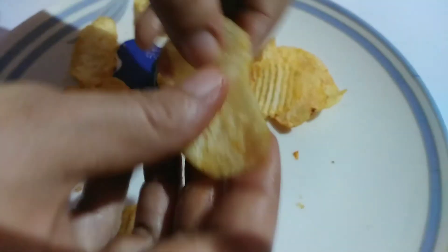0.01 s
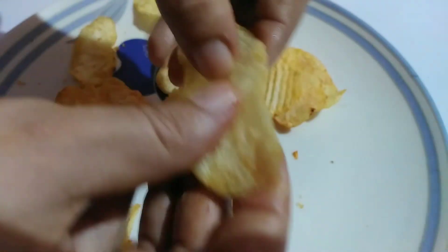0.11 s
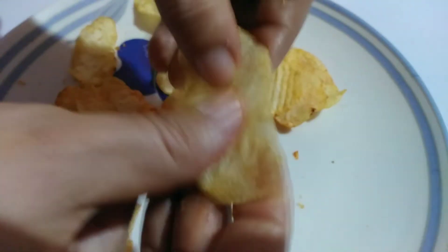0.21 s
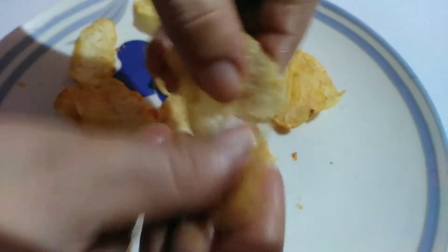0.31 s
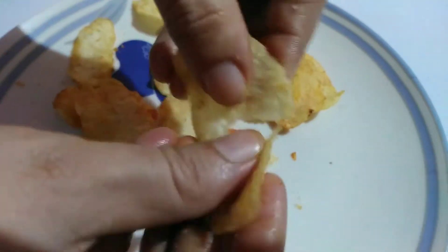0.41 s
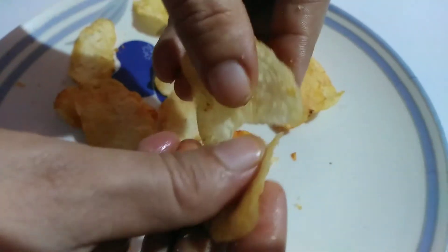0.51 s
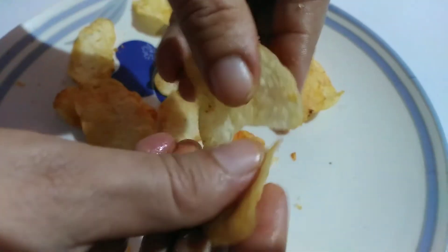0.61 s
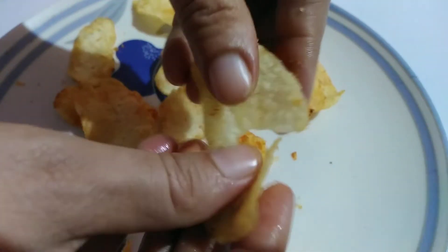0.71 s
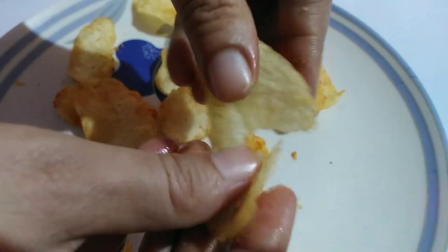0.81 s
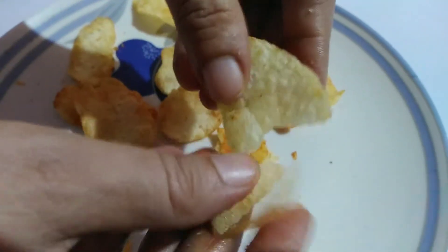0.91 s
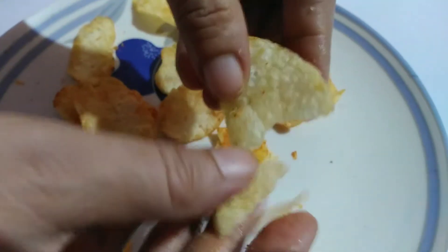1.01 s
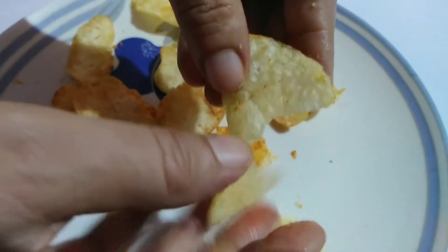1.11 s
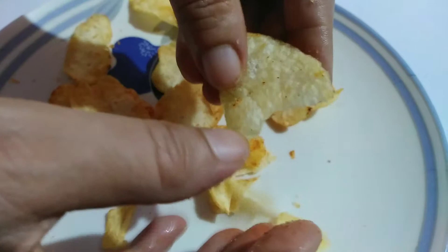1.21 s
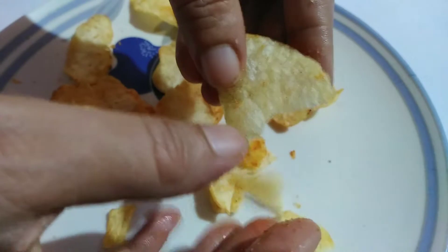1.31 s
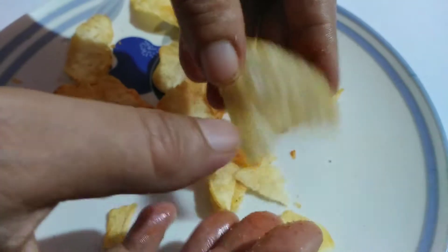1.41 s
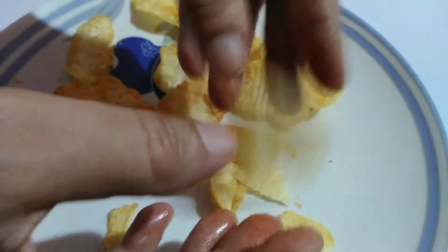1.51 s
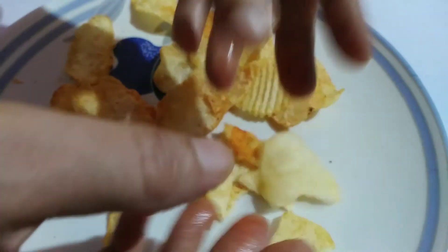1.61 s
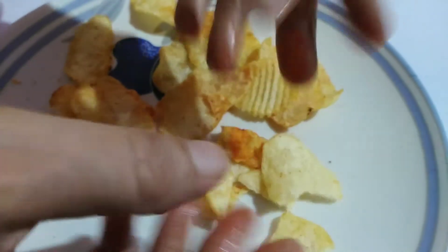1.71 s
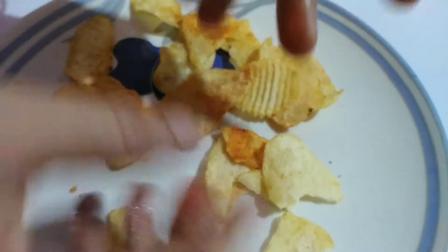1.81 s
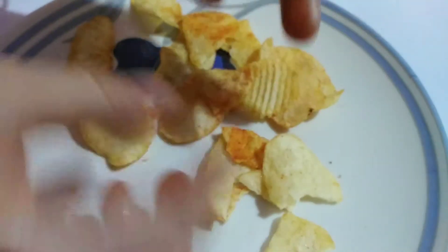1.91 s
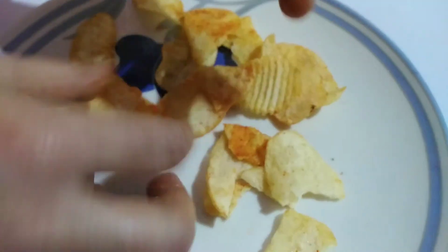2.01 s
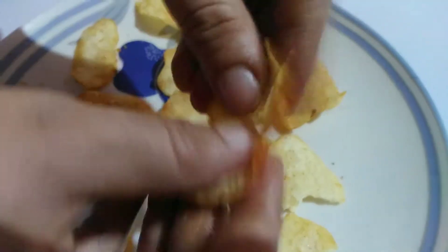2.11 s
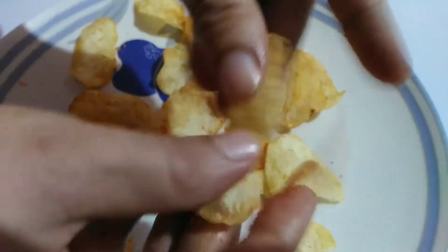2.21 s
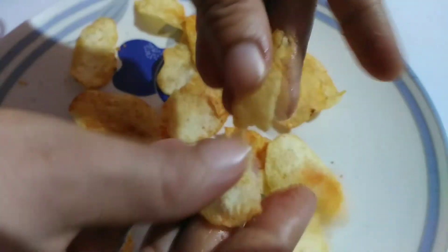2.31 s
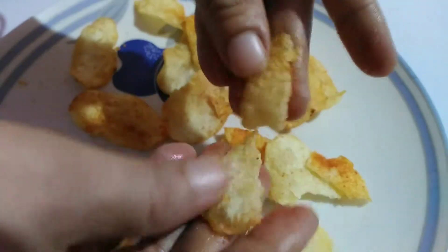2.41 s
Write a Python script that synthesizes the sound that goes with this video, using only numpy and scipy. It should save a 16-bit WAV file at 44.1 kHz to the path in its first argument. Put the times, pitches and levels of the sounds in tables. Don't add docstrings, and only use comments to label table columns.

```python
import sys
import numpy as np
from scipy import signal
from scipy.fft import rfft, irfft, next_fast_len
from scipy.io import wavfile
from scipy.ndimage import uniform_filter1d

SR = 44100
rng = np.random.default_rng(int(sys.argv[2]) if len(sys.argv) > 2 else 0)


def boost(x):
    u = np.asarray(x, float) / 20
    return 10 ** u


def store_wav(level_fs):
    pcm = np.round(np.clip(np.atleast_2d(level_fs), -1, 1) * 32767)
    wavfile.write(sys.argv[1], SR, pcm.T.astype(np.int16))


N = 110250
LEAD = 6615
BURST = 4096
SIDES = np.array([[1], [-1]])


def t_axis(size):
    return np.arange(size) / SR


def band(x, hz, width, order=1):
    edges = [hz * 2 ** (-width / 2), min(hz * 2 ** (width / 2), 0.45 * SR)]
    return signal.sosfilt(signal.butter(order, edges, "band", fs=SR, output="sos"), x)


def unit(x):
    return x / np.sqrt(np.mean(x ** 2))


def walk(rate):
    k = int(SR / rate)
    return unit(uniform_filter1d(uniform_filter1d(rng.standard_normal(N), k), k))


def contour(f, table):
    hz, db = np.transpose(table)
    return np.interp(np.log(f), np.log(hz), db)


def even(x):
    spec = rfft(x)
    return irfft(spec / np.sqrt(uniform_filter1d(abs(spec) ** 2, size=40)), len(x))


def modal_sum(modes, phases, size):
    t = t_axis(size)
    out = np.zeros(size)
    for (hz, db, t60), phase in zip(modes, phases):
        out += boost(db) * np.sin(2 * np.pi * hz * t + phase) * boost(-60 * t / t60)
    onset_s = 0.00013
    return out * (1 - np.exp(-t / onset_s))


def fracture_force(burst_s):
    rise_s, crumb_s, crumb_db, strike = 0.0005, 0.016, -21, 3.6
    t = t_axis(BURST)
    fade = np.exp(-(t / burst_s) ** 2) * (1 - np.exp(-(t + 1 / SR) / rise_s))
    size = np.minimum(rng.exponential(1, BURST), 3.5)
    burst = fade * boost(1 * size) * (rng.random(BURST) < 0.5)
    crumbs = boost(crumb_db) * np.exp(-t / crumb_s) * (rng.random(BURST) < 0.05) * (t > burst_s)
    force = rng.standard_normal(BURST) * (burst + crumbs * boost(3 * size))
    force[int(rise_s * SR)] += strike
    return even(force) * (t < 0.08)


def chip_modes(hz, spread, t60, count):
    modes = [(hz, 1.5, 2.6 * t60)]
    for a, (shift, gain) in zip(np.linspace(-2, 2, count), rng.standard_normal((count, 2))):
        mode_hz = min(hz * 2 ** (spread * (a + 0.0667 * shift)), 15000)
        modes.append((mode_hz, 2.0 * gain - 6.0 * a * a, t60))
    return modes


def cracks(rows, burst_s, spread, ring_t60, plate_db, lag_s, lean_db, count=24):
    # (frequency [Hz], level [dB], T60 [s])
    plate = [(1420, -4, .02), (1998, -17.5, 0.024), (2100, -7.5, 0.015), (2484, -10, 0.086),
             (3105, -17, .015), (3470, -6.5, 0.005), (4540, 8, 0.0036), (5211, -2, 0.03),
             (5860, -0.5, 0.005)]
    out = np.zeros((2, N + LEAD + 8192))
    for s, db, hz, pan_db, treble_db in rows:
        force = fracture_force(burst_s)
        chip = chip_modes(hz, spread, ring_t60, count)
        tick = band(force, 9100, 0.65, order=2) + boost(-4.5) * band(force, 12400, 0.45, order=2)
        phases = np.pi * rng.integers(0, 2, count + 1 + len(plate))
        for c, side in enumerate((1, -1)):
            turn = phases + 0.64 * rng.standard_normal(len(phases))
            body = boost(plate_db) * unit(modal_sum(plate, turn[::-1], size=2048))
            body[:768] += 1.63 * unit(modal_sum(chip, turn, size=768))
            low = signal.fftconvolve(force, body)[:BURST]
            x = low / abs(low).max() + boost(treble_db) * tick / abs(tick).max()
            at = int((s + side * lag_s / 2) * SR) + LEAD
            level_db = db + side * np.clip(pan_db + lean_db, -12, 12) / 2
            out[c, at:at + BURST] += boost(level_db) * x / abs(x).max()
    return out


def snaps():
    # (time [s], peak level [dB], ring [Hz], L-R [dB], treble [dB])
    fractures = [(0.2451, -2.5, 4300, -0.5, -4), (0.2518, 2, 6020, 6.5, -5), (0.2536, 0, 5820, 3, -6),
                 (0.2642, -20, 6500, -7, -9.5), (0.272, -10.5, 7800, 2.5, -5.5), (0.2734, 1, 5230, 3, 4),
                 (0.2756, -10, 4750, 1.5, -2.5), (0.2783, -6.5, 6830, -2, -12.5),
                 (0.2944, -14, 3520, -10.5, -8), (0.347, -39.5, 5700, 1.5, -8.5),
                 (0.3534, -28.5, 6130, -8, -0.5), (0.366, -31.5, 6500, -2.5, -8),
                 (0.3963, -32.5, 5300, -9.5, 1.5)]
    return cracks(fractures, 0.0018, 0.88, 0.003, -16.0, 0.00081, -6)


def ticks():
    # (time [s], peak level [dB], ring [Hz], L-R [dB], treble [dB])
    crust = [(0.1063, -50, 2220, -8.5, 13), (0.5596, -35.5, 2360, -14, -1), (0.5982, -26, 7700, 3.5, 6.5),
             (0.638, -38.5, 5820, -16.5, -2), (0.6707, -42, 8950, -9, -17), (0.6949, -57, 2920, -22, 2.5),
             (0.7854, -50.5, 2493, -10.5, 12.5), (0.8112, -44.5, 5620, -13, 5),
             (0.8147, -54, 3700, 2.5, -11.5), (0.9993, -52, 3470, 3, -1), (2.1195, -36, 8720, -7.5, 9.5),
             (2.1394, -46, 8840, -0.5, 15)]
    return cracks(crust, 0.00068, 0.28, 0.0029, -6.5, 0.00066, -1)


def further_cracks():
    close_s = [-.07, .2315, 1.0772, 1.205, 1.233, 1.2503, 1.316]
    # (peak level [dB], ring [Hz], L-R [dB], treble [dB])
    close = [(-18.5, 7800, -7.5, -5), (-27.5, 8500, -1, 3.5), (-22.5, 5700, 5.5, -18),
             (-44, 7800, -10, -12), (-38.5, 4100, 7, -2), (-26, 8770, 9, -14), (-36.5, 9000, -10, -19)]
    rows = [(s, *row) for s, row in zip(close_s, close)]
    return cracks(rows, 0.0064, 0.69, 0.0083, -15.0, 0.00048, -8)


def drops():
    # (time [s], peak level [dB], ring [Hz], L-R [dB], treble [dB])
    landings = [(1.075, -9.5, 2540, -0.5, -24), (1.0855, -14, 4870, 6, -12.5), (1.1081, -19, 5230, 7, -5.5),
                (1.1115, -16.5, 2300, 7.5, -28), (1.1742, -20.5, 5137, 5.5, 1),
                (1.2224, -31.5, 5140, 7, -6), (1.257, -12, 3440, 12, -17), (1.2778, -23.5, 5000, 2, -1),
                (1.3085, -31.5, 8700, 2, -3), (1.3817, -23.5, 2566, 11.5, -5.5),
                (1.5677, -15, 2703, 2.5, -10.5), (1.5845, -14.5, 4540, 6, -7.5),
                (1.618, -21.5, 2570, -3, -13), (1.6395, -10, 2410, 6.5, -6), (1.6535, -46, 2500, 15, -27.5),
                (1.6634, -31.5, 2410, -12.5, -28), (1.694, -19.5, 2590, 9, -15),
                (1.7116, -36, 2750, -13.5, -13.5)]
    return cracks(landings, 0.0033, 0.602, 0.0049, -1.16, -0.00032, -5)


def picks():
    # (time [s], peak level [dB], ring [Hz], L-R [dB], treble [dB])
    lifts = [(2.2992, -25, 2600, 4, -1), (2.3278, -21, 4050, -6.5, -6), (2.3425, -17, 5670, 12, -16),
             (2.3582, -32, 5450, -9, -20), (2.392, -26, 5600, 5.5, -23), (2.411, -16.5, 4540, 9.5, 2.5),
             (2.4535, -23, 4510, 7, -8)]
    return cracks(lifts, 0.0035, 0.64, 0.011, -10, -0.0002, -3.5)


def struck_tones():
    # (time [s], peak level [dB], frequency [Hz], T60 [s])
    tones = [(.2451, -29.5, 900, 0.012), (0.2454, -6.5, 3794, 0.0068), (0.2518, -24, 1390, 0.013),
             (.2522, -37, 791, 0.029), (.2735, -31.5, 606, 0.022), (0.2718, -27, 1456, .02),
             (0.2729, -16, 2830, 0.0087), (.2945, -35.5, 1400, .02), (1.0757, -36, 995, 0.022),
             (1.0746, -12, 2700, .008), (1.0847, -44.5, 950, 0.046), (1.11, -22.5, 2040, 0.019),
             (1.2575, -29.5, 2100, 0.025), (1.2575, -21, 5180, 0.014), (1.382, -32.5, 5280, 0.013),
             (1.567, -43, 1000, 0.031), (1.569, -23.5, 4440, 0.014), (1.5845, -45, 630, 0.054),
             (1.5847, -22.5, 1850, 0.024), (1.5855, -15, 3723, 0.0079), (1.6397, -26.5, 2055, 0.022),
             (1.6397, -42, 1510, 0.018), (1.6405, -11.5, 5300, 0.011), (1.64, -12, 4120, 0.0065),
             (1.6397, -12.5, 2484, .014), (1.586, -22.5, 4540, .015), (.5598, -39.5, 5780, .01),
             (1.0755, -25, 1595, 0.016), (1.1745, -28, 3900, 0.012), (2.299, -42, 1425, 0.058),
             (2.3, -37.5, 1850, 0.036), (2.2992, -29, 3000, 0.029), (2.3, -36, 2380, 0.043),
             (2.343, -24, 3440, 0.014), (2.343, -23.5, 6960, .015), (2.4115, -27, 2660, 0.02),
             (1.2578, -16, 3200, 0.012), (.5985, -36, 6120, 0.0085), (2.328, -45, 1420, 0.038),
             (2.331, -36.5, 2450, .04), (2.342, -46, 1510, 0.026), (2.343, -26.5, 5330, 0.02),
             (2.412, -23, 8180, 0.011), (0.639, -39.5, 5370, 0.011)]
    out, t = np.zeros((2, N + LEAD + 8192)), t_axis(BURST)
    for (s, db, hz, t60), turn in zip(tones, rng.standard_normal((len(tones), 2, 1))):
        at = int(s * SR) + LEAD
        envelope = boost(db - 60 * t / t60) * (1 - np.exp(-t * hz * 1.7))
        out[:, at:at + BURST] += envelope * np.sin(2 * np.pi * hz * t + 0.5 * turn)
    return out


def ports(x):
    # (frequency [Hz], L-R [dB])
    lean = [(500, -10), (1000, -10), (1500, -10.5), (2100, -7), (2900, 1), (4100, 5.5), (5800, 7),
            (8000, 5), (14000, -3)]
    n = next_fast_len(x.shape[1])
    f = np.maximum(np.fft.rfftfreq(n, 1 / SR), 10)
    gain = boost(contour(f, lean) * SIDES / 2)
    return irfft(rfft(x, n, axis=1) * gain, n, axis=1)[:, :x.shape[1]]


def room(x):
    # (frequency [Hz], level [dB], T60 [s])
    tail = [(810, -23, 0.33), (1300, -19.5, 0.16), (1850, -13.5, 0.11), (2537, -15, 0.21),
            (3500, -11.5, 0.14), (5400, -15.5, 0.25), (7820, -20, 0.27), (10600, -19.5, 0.28),
            (14058, -24.5, 0.19)]
    delay, spill, grain_db, pan_db = int(0.0012 * SR), 0.5, 2.5, 4.5
    out, n = 0, x.shape[1]
    for hz, db, t60 in tail:
        power = band(x, hz, 0.8, order=2) ** 2
        power = (1 - spill / 2) * power + spill / 2 * power[::-1]
        power = np.roll(uniform_filter1d(power, delay + 1), delay, axis=1)
        stored = signal.lfilter([1 / (0.0055 * SR)], [1, -boost(-120 / (t60 * SR))], power)
        grain = boost(grain_db * unit(uniform_filter1d(rng.standard_normal(n), size=132)))
        noise = unit(band(rng.standard_normal((2, n)), hz, 0.493, order=3))
        out = out + boost(db) * np.sqrt(np.maximum(stored, 0)) * grain * noise
    return out * boost(SIDES * pan_db / 2)


def rubs():
    # (time [s], level [dB], centre [Hz], length [s], width [octaves])
    strokes = [(0.012, -54.5, 5400, 0.0213, 0.95), (0.022, -67, 10100, 0.063, 3.7),
               (0.62, -67, 7880, 0.05, 0.6), (.81, -66.5, 5600, 0.027, 1.8),
               (0.903, -65, 3225, 0.055, 0.441), (0.918, -69.5, 6200, 0.04, 0.67), (2, -79, 5473, .1, 0.23),
               (2.13, -67, 9060, 0.024, 1.47), (.375, -51, 6600, .04, .9)]
    t, out = t_axis(N), 0
    for s, db, hz, length_s, octaves in strokes:
        swell = boost(db + 1.9 * walk(47)) * np.exp(-0.5 * ((t - s) / length_s) ** 2)
        out = out + swell * unit(band(rng.standard_normal((2, N)), hz, octaves, order=2))
    return out


def thuds():
    # (time [s], level [dB], frequency [Hz], length [s])
    knocks = [(0.282, -60.5, 58.43, .025), (0.714, -67.5, 57.5, 0.042), (0.933, -61.5, 59.1, .05),
              (1.154, -64, 56, 0.063), (1.73, -67.5, 59.9, 0.063), (2.447, -62.5, 58.2, 0.0364)]
    t, out = t_axis(N), np.zeros(N)
    for s, db, hz, length_s in knocks:
        pulse = np.exp(-0.5 * ((t - s) / length_s) ** 2)
        out += np.sqrt(2) * boost(db) * pulse * np.sin(2 * np.pi * hz * t)
    return out * boost(-1.5 * SIDES)


def hum():
    # (frequency [Hz], rms level [dB])
    partials = [(192.7, -60.5), (382, -75), (583.5, -77.5), (177.5, -68.5), (93, -86), (134.1, -84)]
    wobble_db, drift = 0.5, 0.0054
    out = np.zeros(N)
    for hz, db in partials:
        level = np.sqrt(2) * boost(db + wobble_db * walk(25))
        phase = 2 * np.pi * np.cumsum(hz * (1 + drift * walk(3.2))) / SR
        out += level * np.sin(phase)
    return out


def air():
    # (frequency [Hz], density [dB per Hz])
    hiss = [(18, -52.5), (30, -18), (145, -15), (199, -9), (227, -14.5), (569, -25), (889, -28.5),
            (2830, -29), (16000, -53)]
    level_db, pan_db, alike_hz = -61.5, 7, 891.8
    f = np.maximum(np.fft.rfftfreq(N, 1 / SR), 10)
    alike = 1 / (1 + (f / alike_hz) ** 2)
    mid, side = rfft(rng.standard_normal((2, N)), axis=1)
    both = np.sqrt(1 + alike) * mid + SIDES * np.sqrt(1 - alike) * side
    both = both * boost(SIDES * pan_db * (1 - alike) / 2)
    return boost(level_db) * unit(irfft(both * boost(contour(f, hiss)), N, axis=1))


def scene():
    chips = snaps() + ticks() + further_cracks() + drops() + picks()
    chips = signal.sosfilt(signal.butter(3, 1920, "high", fs=SR, output="sos"), chips)
    chips = ports(chips + struck_tones())
    return (chips + room(chips))[:, LEAD:LEAD + N] + rubs() + thuds() + hum() + air()


def low_pass(x):
    return signal.sosfilt(signal.butter(12, 16510, fs=SR, output="sos"), x)


def record(dry):
    x = signal.sosfilt(signal.butter(3, 36, "high", fs=SR, output="sos"), np.clip(dry, -1, 1))
    x = signal.sosfilt(signal.ellip(8, 0.2, 60, 15900, fs=SR, output="sos"), x)
    return low_pass(np.clip(x, -1, 1))


dry = scene()
out = record(dry)
store_wav(out)
```